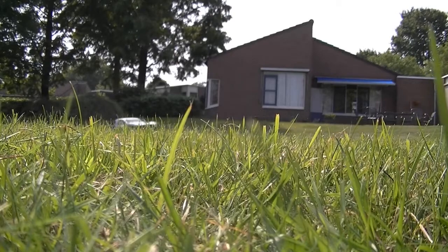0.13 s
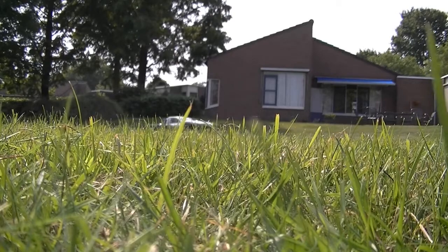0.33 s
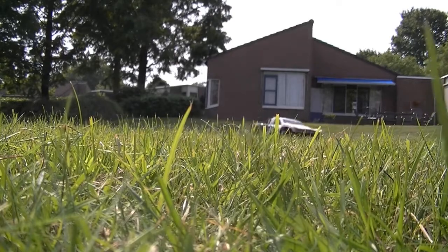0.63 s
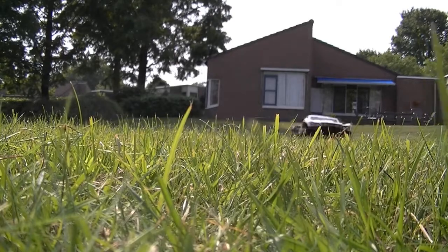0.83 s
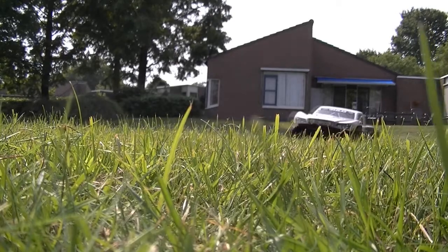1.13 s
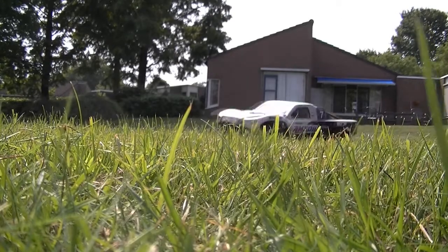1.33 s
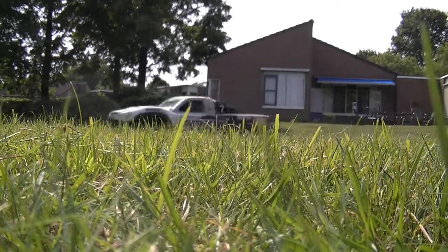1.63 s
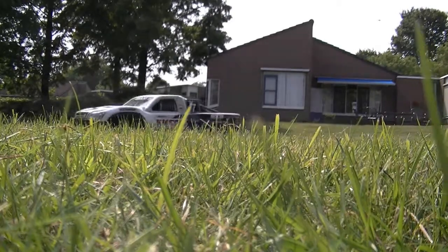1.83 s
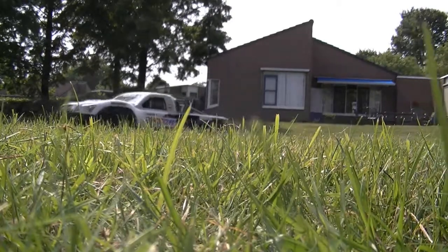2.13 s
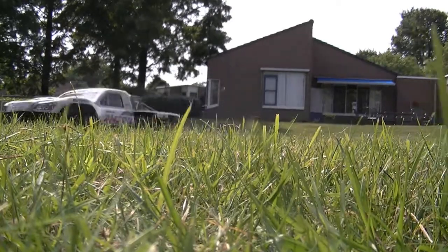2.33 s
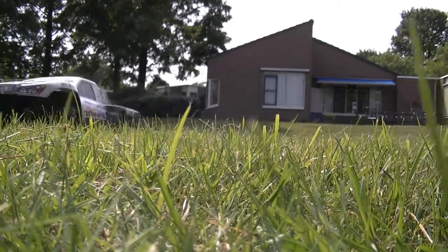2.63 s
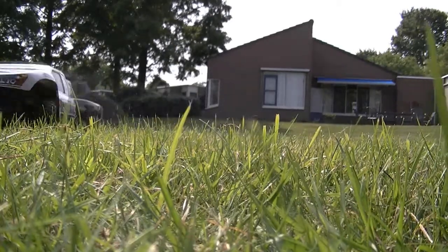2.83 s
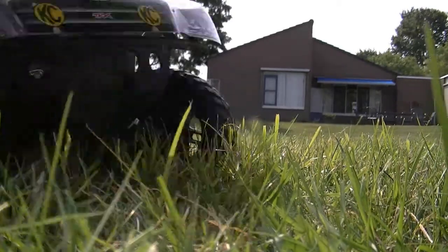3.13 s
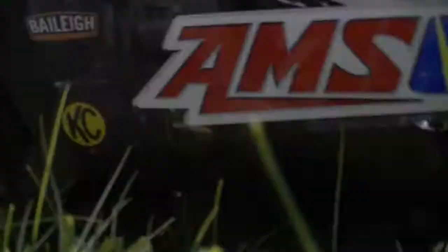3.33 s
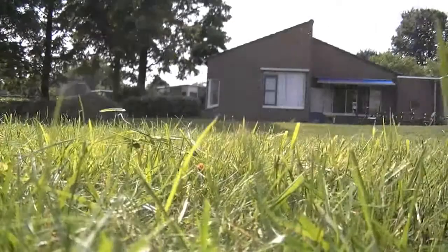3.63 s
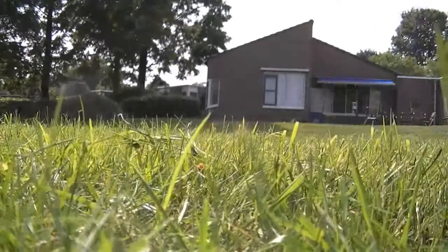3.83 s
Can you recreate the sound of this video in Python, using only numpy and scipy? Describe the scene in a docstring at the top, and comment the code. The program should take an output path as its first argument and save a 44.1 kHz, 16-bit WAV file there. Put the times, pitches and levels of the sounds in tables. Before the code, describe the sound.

Small electric toy truck whines and rattles across a lawn, racing close by the microphone.

```python
"""Radio-controlled truck on a lawn

An electric truck crosses grass in short bursts of throttle, then races past a two-port microphone.
Gears: swayed sines at the tooth rates. Shell, chassis and brushed grass: grainy noise through spectra.
Clacks of the drive and thuds on bumps: decaying noise through a part's ring. Crushed tufts crunch.
Grass scatters the truck's sound differently to each port; quiet outdoor air lies beneath."""
import sys
import numpy as np
from scipy import signal
from scipy.fft import rfft, irfft
from scipy.io import wavfile
from scipy.ndimage import map_coordinates

SR = 44100
rng = np.random.default_rng(int(sys.argv[2]) if len(sys.argv) > 2 else 0)


def to_wav(sig):
    """Store sig (one row per channel, or 1-D mono) as 16-bit WAV at the path in sys.argv[1].

    Samples outside -1..1 are clipped; the rate is SR.
    """
    pcm = np.clip(np.atleast_2d(sig), -1, 1) * 32767
    pcm = np.round(pcm).astype(np.int16)
    wavfile.write(sys.argv[1], SR, pcm.T)  # frames by channels


N = 176400

# Outdoor air, relative spectrum: (frequency [Hz], density [dB per Hz])
AIR_SPECTRUM = [(18, -82), (30, -56), (130, -26.5), (684, -23), (1810, -36), (9970, -42), (16000, -48)]
AIR_RMS_DB = -53

# Rolling over the lawn, levels before the trims below:
# (time [s], shell drumming [dB], chassis rattle [dB], treble rustle [dB])
ROLL_LEVELS = [(0.11, -50.5, -49.5, -72), (0.22, -45, -47.5, -93), (0.4, -36, -43.5, -53.5),
               (0.78, -48, -53, -66.5), (1.04, -40.5, -38, -45), (1.23, -44.5, -47.5, -57.5),
               (1.62, -41.5, -51.5, -46.5), (1.78, -49, -57, -60), (2.13, -56, -64, -83),
               (2.17, -37, -35.5, -46.5), (2.3, -27.5, -28, -39), (2.385, -36, -41.5, -45),
               (2.47, -38, -45, -59), (2.55, -51, -49, -57.5), (2.695, -49, -54, -63),
               (2.73, -44, -44.5, -51), (2.8, -35, -25, -41.5), (2.92, -29.5, -22, -31),
               (3.13, -26.5, -19, -32.5), (3.36, -21.5, -22.5, -33), (3.43, -23.5, -35, -46.5),
               (3.47, -29.5, -58, -41), (3.56, -22, -27.5, -38.5), (3.635, -28, -23, -44.5),
               (3.67, -28, -16, -43), (3.74, -30, -14, -39.5), (3.83, -29.5, -19, -33.5),
               (4.0, -28.5, -26, -38)]
SHELL_TRIM_DB, RATTLE_TRIM_DB, RUSTLE_TRIM_DB = -2, -5, 1
# Relative spectra of drumming, rattle and rustle: (frequency [Hz], density [dB per Hz])
SHELL_SPECTRUM = [(60, -42.5), (200, -27.5), (330, -13), (620, -5.5), (700, 3), (820, -11), (950, -7),
                  (3000, -46.5)]
RATTLE_SPECTRUM = [(100, -39), (900, 4), (3500, -3), (5400, -8), (7000, -14.5), (16000, -72)]
RUSTLE_SPECTRUM = [(500, -57), (5400, -19.5), (8000, 3.5), (10500, 8), (13000, -3.5), (16000, -19)]
GRAINS_PER_S, GRAIN_SPREAD_DB = 4000, 2.4
SMOOTH_SHARE = .6  # smooth noise rms over click rms

# Clacks of drive and chassis: (time [s], body knock level [dB], snap level [dB])
CLACKS = [(0.1345, -33, -15), (0.146, -30.5, -28), (0.155, -33.5, -24.5), (0.75, -29, -22),
          (0.762, -29.5, -23), (.912, -32.5, -44), (1.478, -38, -38.5), (1.985, -33, -67),
          (2.093, -35, -45), (2.147, -27, -39), (2.161, -20.5, -28.5), (2.39, -34, -57), (2.715, -28, -29),
          (3.079, -23, -19), (3.128, -29, -14.5), (3.614, -30, -19.5)]
# Relative ring spectra of knock and snap: (frequency [Hz], gain [dB])
KNOCK_SPECTRUM = [(100, -40.5), (560, 2.5), (950, 2.5), (1450, 2.5), (2000, -20.5), (8000, -37)]
SNAP_SPECTRUM = [(150, -42), (1000, -6.5), (3400, -1), (4350, 9.5), (6000, -1.5), (7400, 6.5), (8700, 4),
                 (10300, 12), (12500, -3), (16000, -21)]
KNOCK_DECAY_S, SNAP_DECAY_S = 0.0078, 0.0032
# Suspension bottoming on bumps: (time [s], level [dB])
THUDS = [(1.329, -35), (1.378, -38.5)]
# Relative ring spectrum of a thud: (frequency [Hz], gain [dB])
THUD_SPECTRUM = [(100, -26), (250, 0), (650, 0), (1500, -16), (6000, -45)]
THUD_DECAY_S = 0.024

# One list per burst of throttle or spell of coasting, before wobble, flutter and body response:
# (time [s], pinion mesh [Hz], pinion level [dB], differential level [dB])
BURSTS = [
    [(.28, 1736, -54, -49), (.32, 2173, -58, -48), (.365, 3096, -51, -35), (.41, 3600, -41.5, -42),
     (.46, 3640, -57, -48)],
    [(.91, 1448, -48.5, -45), (.97, 2153, -52, -45), (1.005, 2753, -41.5, -43), (1.06, 2703, -41.5, -45.5)],
    [(1.54, 3505, -61, -44.5), (1.7, 3224, -62.5, -74)],
    [(2.165, 1985, -42, -52), (2.183, 1453, -28.5, -41), (2.22, 1875, -38, -37.5),
     (2.265, 2173, -49, -27.5), (2.288, 2555, -47, -30.5), (2.322, 2772, -37, -28.5)],
    [(2.372, 2233, -34.5, -30), (2.39, 1312, -35, -37)],
    [(2.715, 732, -27, -64), (2.745, 596, -27.5, -68), (2.78, 1107, -27, -59), (2.815, 1817, -31, -33.5),
     (2.885, 2880, -32.5, -25.5), (2.925, 3560, -28.5, -26), (2.99, 3620, -28, -28),
     (3.045, 4473, -38, -20.5), (3.078, 4340, -35.5, -21.5)],
    [(3.135, 3206, -36, -26), (3.15, 2576, -16.5, -36), (3.16, 2200, -29, -45)],
    [(3.205, 2304, -21.5, -37), (3.222, 1665, -18.5, -58), (3.235, 1286, -24, -50)],
    [(3.236, 2560, -26, -26.5), (3.25, 2730, -22, -37)],
    [(3.32, 3110, -49, -35), (3.42, 3095, -52, -22.5), (3.436, 2807, -36, -15.5), (3.452, 3130, -54, -27.5)],
    [(3.484, 3140, -64, -22), (3.505, 2814, -46, -22.5)],
    [(3.645, 633.5, -19.5, -55), (3.665, 711, -14.5, -59), (3.7, 868, -16, -48), (3.738, 1395, -17, -40),
     (3.752, 1692, -22, -39), (3.8, 2666, -27, -24), (3.83, 3226, -25.5, -27.5), (3.885, 3530, -33, -46),
     (3.915, 3780, -35, -34.5), (3.95, 4076, -47, -27.5), (4, 4150, -34, -29)],
]
DIFF_RATIO, PINION_TEETH = .238, 19  # differential mesh over pinion mesh; teeth per motor turn
SPEED_WOBBLE, WOBBLE_HZ = 0.007, 89.24  # rms share of the speed; rate
FLUTTER_RMS_DB, FLUTTER_HZ, CHATTER_HZ = 4, 170, 450
ECCENTRIC_RAD = 0.28
# Pinion overtones relative to their mesh tone: (overtone frequency [Hz], gain [dB])
PINION_OVERTONES = [(1200, -12.5), (3700, -8), (5000, -9.5), (7200, -5.5), (8400, -13), (10600, 8),
                    (13000, -18)]
# Shell's radiation of the differential's tones: (frequency [Hz], gain [dB])
DIFF_BODY = [(400, -12), (690, 6), (830, 1.5), (1100, -2.5), (1400, -14.5)]
PINION_FALL_DB, DIFF_FALL_DB = -6, -2  # per harmonic, from the 2nd and the 1st

# Tufts crushed beside the microphone: (time [s], peak level [dB])
TUFTS = [(3.149, -19.5), (3.182, -21), (3.27, -17.5), (3.309, -16), (3.356, -16)]
# Relative spectrum of crushed blades: (frequency [Hz], density [dB per Hz])
CRUNCH_SPECTRUM = [(100, -41), (1200, 6.5), (3600, -0.5), (6000, -12), (16000, -11)]
BLADES_PER_S, CRACKLE_PEAK_DB, NEAREST_S = 900, -27, 3.42
TUFT_SPAN_S, NEAR_SPAN_S = .011, .38  # peak to 1/e

# Truck position: (time [s], left over right [dB], lead of the left port [ms])
PATH = [(2.3, 2, .05), (3.3, 4, .06), (3.5, -5, -.06), (3.75, -6.5, -.1)]
# Sound scattered by the grass: (frequency [Hz], gain [dB])
SCATTER_GAIN = [(800, -23), (1500, -10), (4000, -4)]
SCATTER_MAX_S, SCATTER_DRIFT_RMS_S = .006, .00006  # longest detour before drift; drift

# Microphone's side signal: (frequency [Hz], gain [dB])
SIDE_GAIN = [(1000, 2), (4000, 1)]
TOP_HZ = 15900


def undb(db):
    """Decibels to gain."""
    return 10 ** (np.asarray(db) / 20)


def unit(x):
    """Scale to rms 1."""
    return x / np.sqrt(np.mean(x ** 2))


def curve(rows, axis):
    """One table column, joined by straight lines in time."""
    rows = np.array(rows, float)
    return np.interp(np.arange(N) / SR, rows[:, 0], rows[:, axis])


def response(points, hz):
    """Gain of a spectrum, interpolated in dB over log frequency."""
    points = np.array(points, float)
    log_hz = np.log(np.maximum(hz, 1))
    return undb(np.interp(log_hz, np.log(points[:, 0]), points[:, 1]))


def colour(x, points):
    """Causal minimum-phase filter with the given spectrum, by folding the cepstrum."""
    size = 2 * N
    cepstrum = irfft(np.log(response(points, np.fft.rfftfreq(size, 1 / SR))))
    cepstrum[1:N] *= 2
    cepstrum[N + 1:] = 0
    return irfft(rfft(x, size) * np.exp(rfft(cepstrum)))[:N]


def walk(rate_hz):
    """Smooth random curve of rms 1, with rate_hz random points a second."""
    points = rng.standard_normal(8192)
    return unit(map_coordinates(points, [np.arange(N) / SR * rate_hz], mode="wrap"))


def grains(per_s=GRAINS_PER_S, smooth=SMOOTH_SHARE):
    """Random clicks of uneven size and sign over smooth noise, rms 1."""
    hit = rng.random(N) < per_s / SR
    size_db = GRAIN_SPREAD_DB * np.minimum(rng.exponential(size=N), 6)
    sign = np.sign(rng.standard_normal(N))
    clicks = hit * undb(size_db) * sign
    return unit(unit(clicks) + smooth * rng.standard_normal(N))


def garden():
    """Quiet outdoor air: independent coloured noise at each port."""
    ports = [unit(colour(rng.standard_normal(N), AIR_SPECTRUM)) for _ in range(2)]
    return undb(AIR_RMS_DB) * np.array(ports)


def rolling():
    """Small jolts drum the shell and rattle the chassis while the tyres brush the grass."""
    shell_db = curve(ROLL_LEVELS, axis=1) + SHELL_TRIM_DB + 1.4 * walk(60)
    rattle_db = curve(ROLL_LEVELS, axis=2) + RATTLE_TRIM_DB + 1.2 * walk(70)
    rustle_db = curve(ROLL_LEVELS, axis=3) + RUSTLE_TRIM_DB + 1.5 * walk(99)
    shell = unit(colour(grains(), SHELL_SPECTRUM)) * undb(shell_db)
    rattle = unit(colour(grains(), RATTLE_SPECTRUM)) * undb(rattle_db)
    rustle = unit(colour(grains(), RUSTLE_SPECTRUM)) * undb(rustle_db)
    return shell + rattle + rustle


def ring(points):
    """Impulse response of a part, with unit energy."""
    pulse = colour(signal.unit_impulse(N), points)[:4096]
    return pulse / np.linalg.norm(pulse)


def struck(start_s, decay_s, part):
    """Exponentially decaying noise sent through a part's impulse response."""
    age_s = np.arange(SR // 4) / SR
    noise = rng.standard_normal(len(age_s)) * np.exp(-age_s / decay_s)
    out, first = np.zeros(N + SR), int(start_s * SR)
    out[first:first + len(age_s)] = signal.fftconvolve(noise, part)[:len(age_s)]
    return out[:N]


def clacks():
    """Each clack is a hollow plastic knock and a shorter hard snap; bumps give duller thuds."""
    knock, snap, thud = ring(KNOCK_SPECTRUM), ring(SNAP_SPECTRUM), ring(THUD_SPECTRUM)
    out = np.zeros(N)
    for start_s, body_db, snap_db in CLACKS:
        out += undb(body_db) * struck(start_s, KNOCK_DECAY_S, knock)
        out += undb(snap_db) * struck(start_s, SNAP_DECAY_S, snap)
    for start_s, db in THUDS:
        out += undb(db) * struck(start_s, THUD_DECAY_S, thud)
    return out


def gears():
    """Pinion and differential sing on tooth rates; bumps shake the speed, motor turns sway the mesh."""
    t, out = np.arange(N) / SR, np.zeros(N)
    shake = 1 + SPEED_WOBBLE * walk(WOBBLE_HZ)
    pinion_flutter = [undb(FLUTTER_RMS_DB * walk(FLUTTER_HZ)) for _ in range(3)]
    diff_flutter = [undb(FLUTTER_RMS_DB * walk(FLUTTER_HZ)) for _ in range(3)]
    chatter = walk(CHATTER_HZ)  # uneven tooth contact roughens the whine
    for burst in BURSTS:
        start_s, end_s = burst[0][0], burst[-1][0] + 0.012
        gate = np.clip(np.minimum(t - start_s, end_s - t) / 0.0056, 0, 1)
        on = gate > 0
        hz = (curve(burst, axis=1) * shake)[on]
        pinion = undb(curve(burst, axis=2)[on])
        diff = undb(curve(burst, axis=3)[on])
        phase = 2 * np.pi * np.cumsum(hz) / SR
        mesh = phase + ECCENTRIC_RAD * np.sin(phase / PINION_TEETH)
        for k in range(1, 4):
            overtone = 1
            if k > 1:
                overtone = response(PINION_OVERTONES, k * hz) * undb(PINION_FALL_DB * (k - 2))
            body = response(DIFF_BODY, k * DIFF_RATIO * hz) * undb(DIFF_FALL_DB * (k - 1))
            pinion_tone = np.sin(k * mesh + .4 * k * chatter[on])
            diff_tone = np.sin(k * DIFF_RATIO * phase)
            out[on] += gate[on] * pinion * overtone * pinion_flutter[k - 1][on] * pinion_tone
            out[on] += gate[on] * diff * body * diff_flutter[k - 1][on] * diff_tone
    return np.sqrt(2) * out  # levels are rms


def crunching():
    """Close by, single blades crackle under the tyres, and each crushed tuft gives a short crunch."""
    t = np.arange(N) / SR
    near = undb(CRACKLE_PEAK_DB) * np.exp(-((t - NEAREST_S) / NEAR_SPAN_S) ** 2)
    tufts = sum(undb(db) * np.exp(-((t - middle_s) / TUFT_SPAN_S) ** 2) for middle_s, db in TUFTS)
    crackle = unit(colour(grains(BLADES_PER_S, 0), CRUNCH_SPECTRUM))
    crunch = unit(colour(grains(), CRUNCH_SPECTRUM))
    return crackle * near + crunch * tufts


def scattered(x, count):
    """Short detours through the grass, whose lengths drift at random."""
    out = np.zeros(N)
    for k in range(count):
        lag_s = SCATTER_MAX_S * (k + rng.random()) / count + SCATTER_DRIFT_RMS_S * walk(14)
        out += map_coordinates(x, [np.arange(N) - lag_s * SR], order=3, mode="nearest")
    return out / np.sqrt(count)


def lawn(x):
    """The truck reaches the nearer port sooner and louder; the grass scatters it differently to each."""
    pan_db = curve(PATH, axis=1)
    lead_samples = curve(PATH, axis=2) * SR / 1000
    spread, ports = colour(x, SCATTER_GAIN), []
    for side in (1, -1):  # left, right
        direct = map_coordinates(x, [np.arange(N) + side * lead_samples / 2], mode="nearest")
        ports.append((direct + scattered(spread, count=4)) * undb(side * pan_db / 2))
    mean_power = (undb(pan_db) + undb(-pan_db)) / 2
    return np.array(ports) / np.sqrt(mean_power)


def scene():
    """The truck on the lawn, in a quiet garden."""
    truck = rolling() + clacks() + gears() + crunching()
    return garden() + lawn(truck)


def record(dry):
    """The microphone filters the side signal for width and cuts the top."""
    mid = (dry[0] + dry[1]) / 2
    side = colour((dry[0] - dry[1]) / 2, SIDE_GAIN)
    top_cut = signal.ellip(10, .2, 80, TOP_HZ, fs=SR, output="sos")
    return signal.sosfilt(top_cut, np.array([mid + side, mid - side]))


dry = scene()
out = record(dry)
to_wav(out)
```